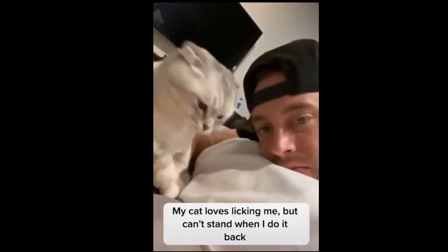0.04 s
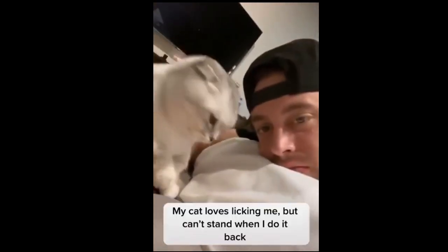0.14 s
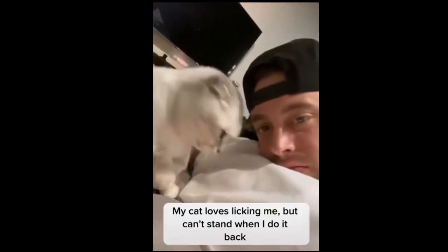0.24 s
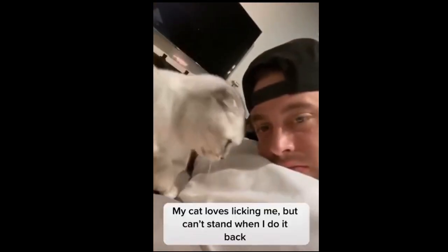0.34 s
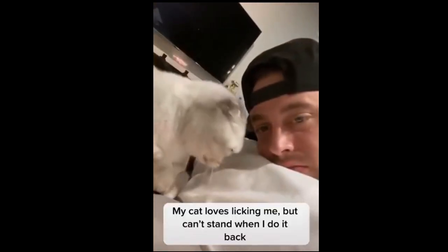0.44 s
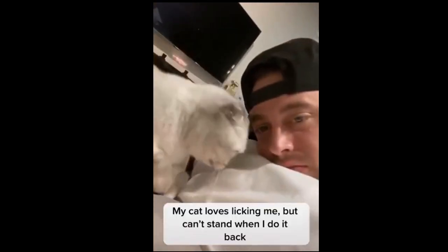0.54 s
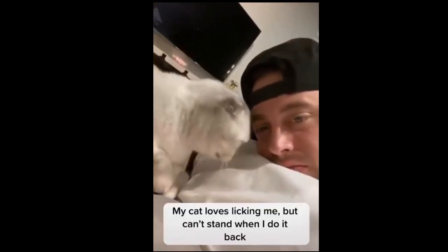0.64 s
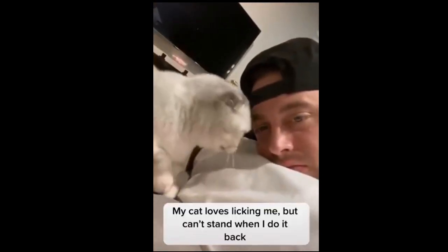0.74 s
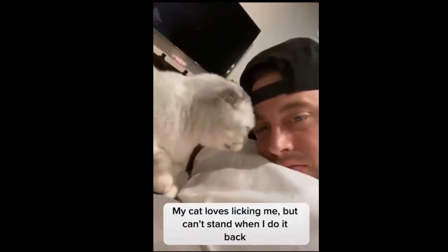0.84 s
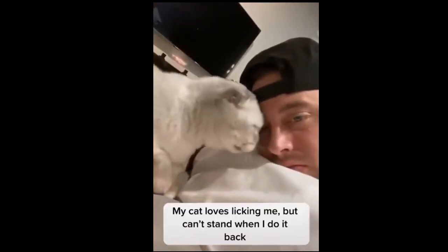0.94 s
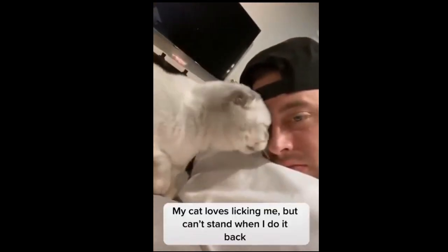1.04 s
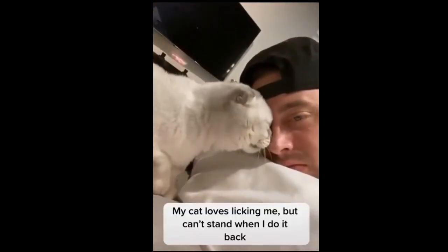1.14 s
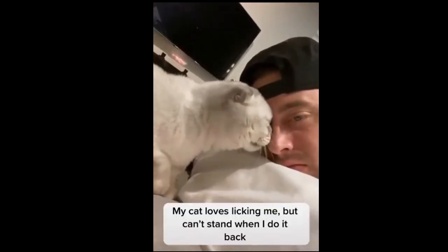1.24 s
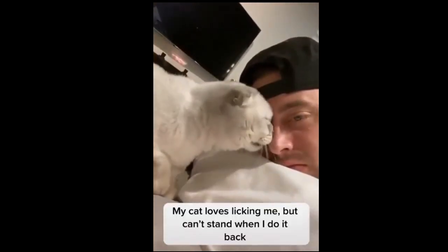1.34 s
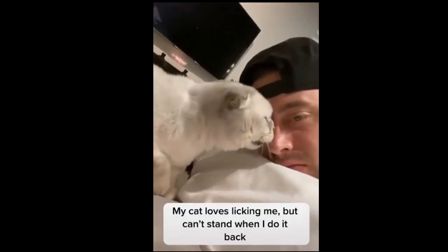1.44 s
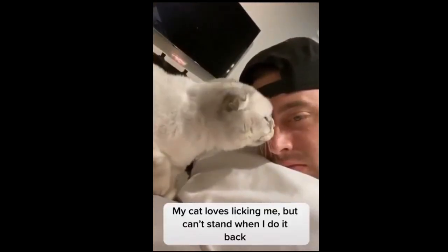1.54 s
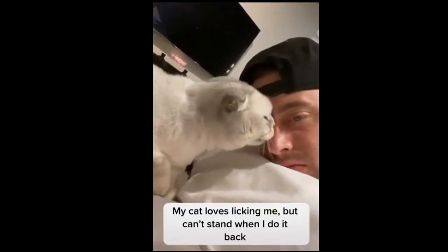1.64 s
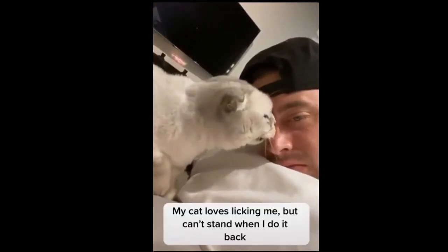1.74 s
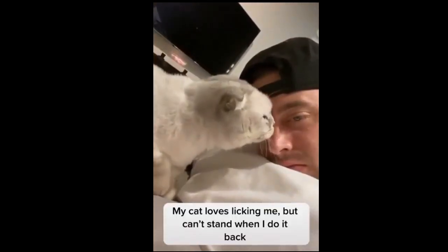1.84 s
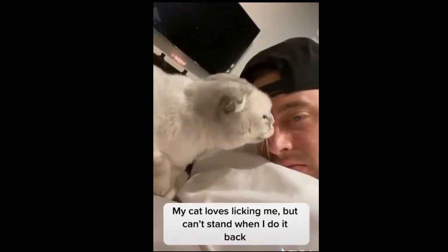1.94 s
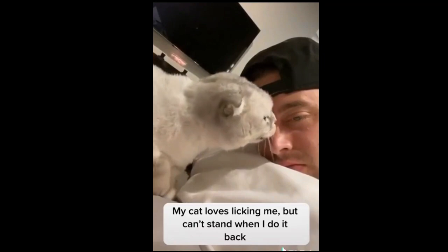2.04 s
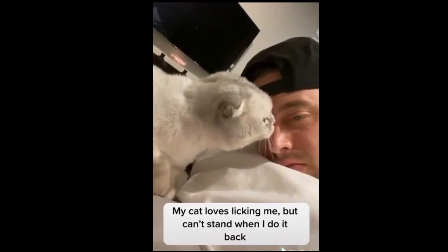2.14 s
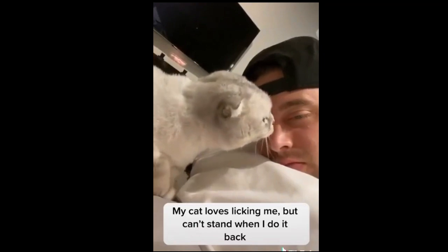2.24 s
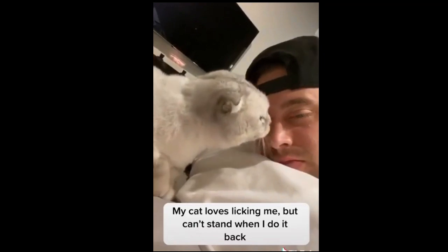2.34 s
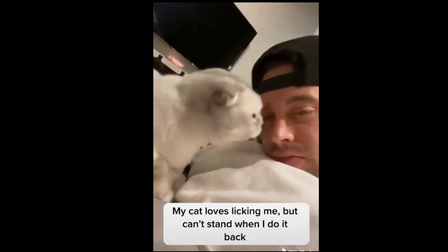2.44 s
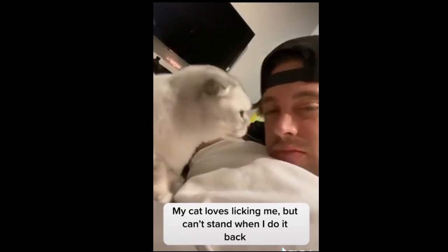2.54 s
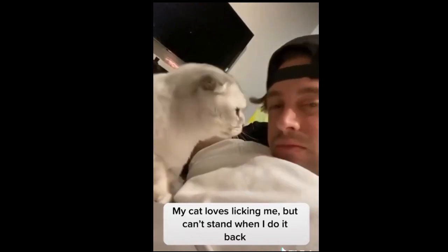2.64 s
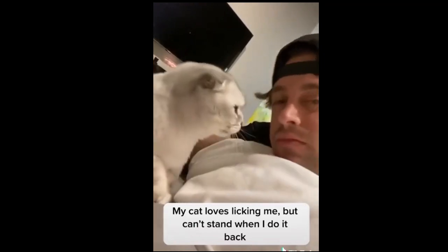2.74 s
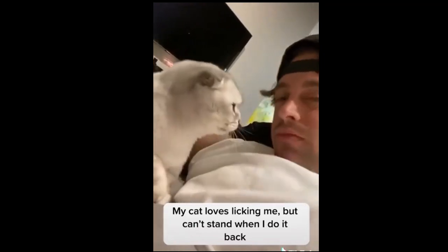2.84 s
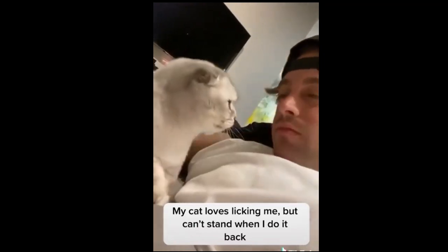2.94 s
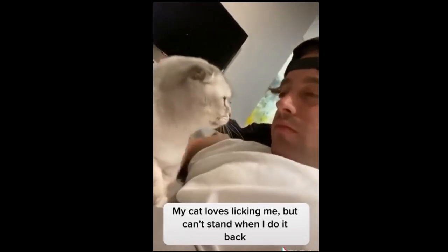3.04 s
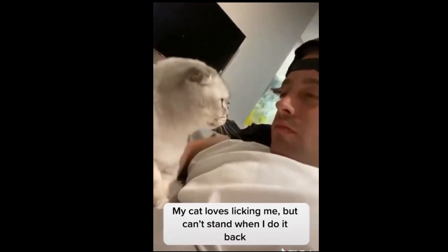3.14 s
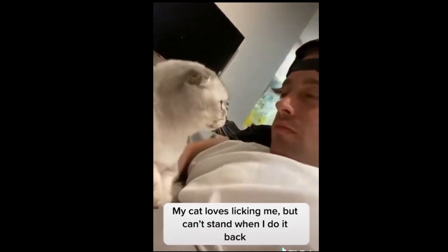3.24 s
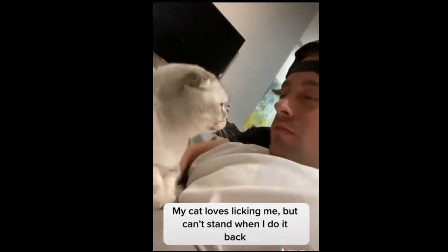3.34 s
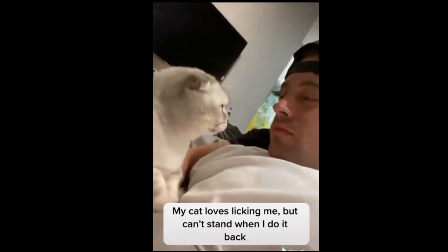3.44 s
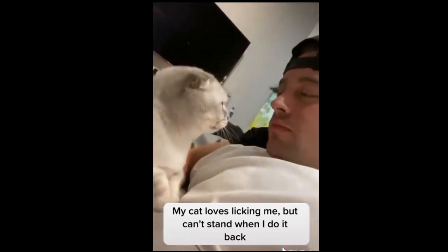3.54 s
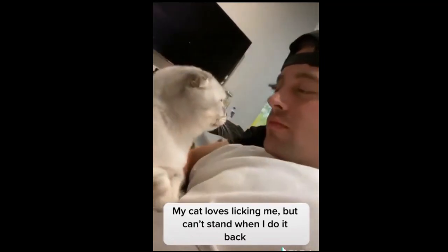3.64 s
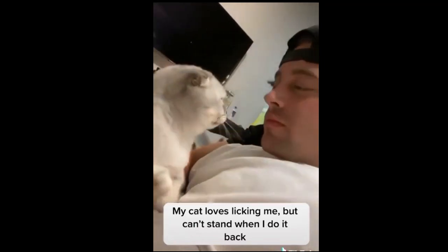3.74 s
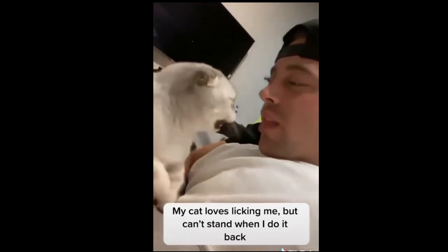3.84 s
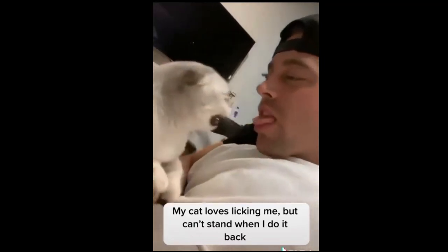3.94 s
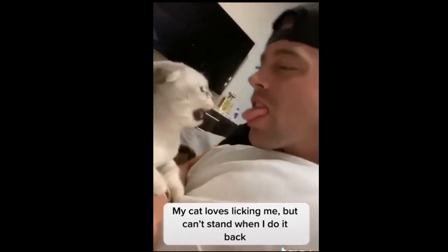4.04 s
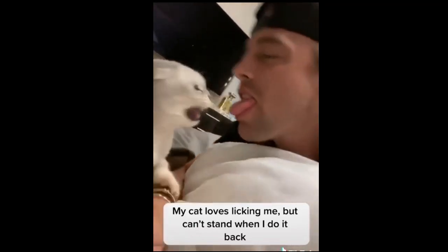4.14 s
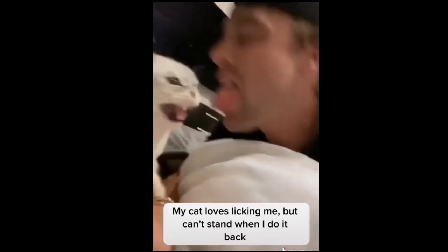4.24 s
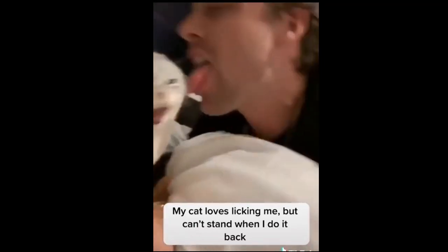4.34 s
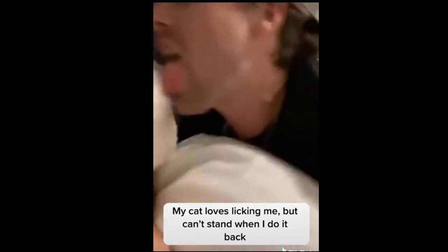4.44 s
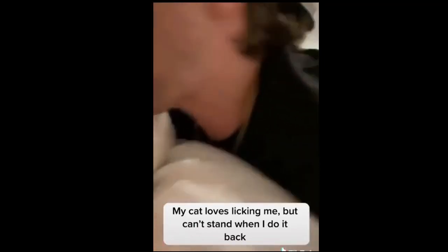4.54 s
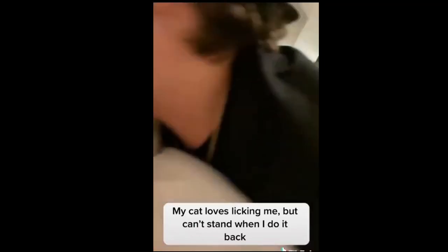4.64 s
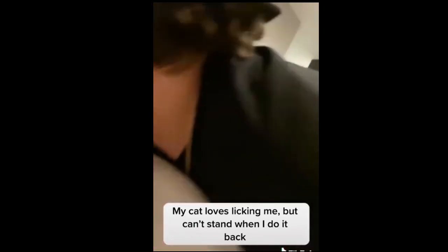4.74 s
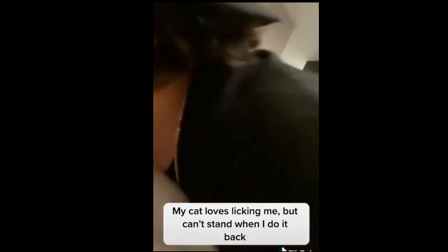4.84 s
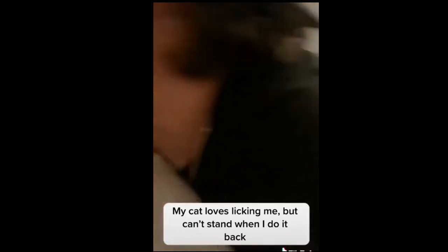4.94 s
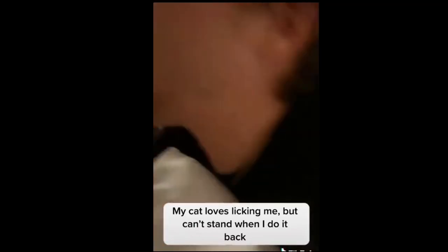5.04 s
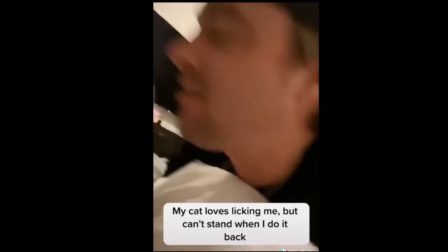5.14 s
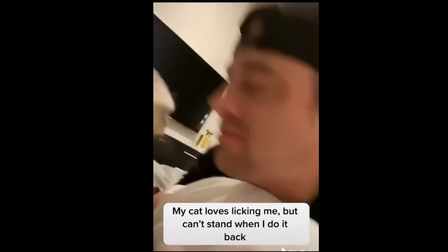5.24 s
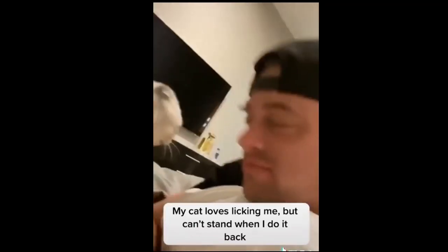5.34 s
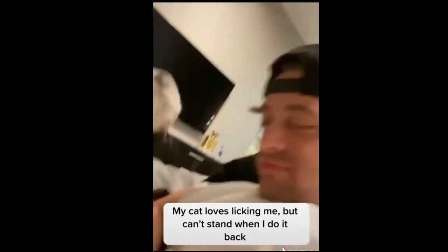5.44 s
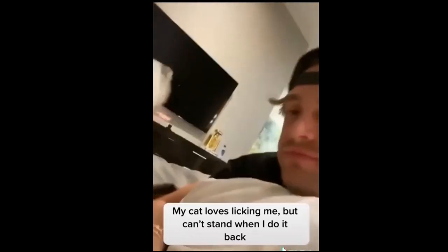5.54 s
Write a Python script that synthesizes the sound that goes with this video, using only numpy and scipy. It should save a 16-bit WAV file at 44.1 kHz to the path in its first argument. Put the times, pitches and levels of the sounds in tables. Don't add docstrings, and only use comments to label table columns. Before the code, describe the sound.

In a quiet room, faint bedding rustles and handling taps lead to one long, high, slightly wavering cat meow, then a loud cloth shuffle.

```python
import sys
import numpy as np
from scipy import signal
from scipy.io import wavfile
from scipy.ndimage import uniform_filter1d

SR = 44100
rng = np.random.default_rng(int(sys.argv[2]) if len(sys.argv) > 2 else 0)


def rack_gain(trim_db):
    fader = np.asarray(trim_db, float)
    return 10 ** (fader / 20)


def store_pcm(level_fs):
    pcm = np.round(np.clip(level_fs, -1, 1) * 32767).astype(np.int16)
    wavfile.write(sys.argv[1], SR, np.atleast_2d(pcm).T)


N = 246122
TIME = np.arange(N) / SR

# (frequency [Hz], density [dB per Hz])
RUMBLE_SPECTRUM = [(12, -59), (20, -26), (54, -6.5), (75, -4), (97, -2.5), (129, -0.5), (157, -5),
                   (259, -7.5), (397, -25), (600, -22), (780, -67), (1320, -120)]
# (frequency [Hz], density [dB per Hz])
AIR_SPECTRUM = [(180, -1), (300, -8), (335, -8.5), (634, -12), (858, -11.5), (991, -13.5), (1410, -10.5),
                (2230, -17.5), (2500, -17.5), (3220, -21), (13500, -63)]
# (frequency [Hz], likeness [0-1])
LIKENESS = [(4200, 1), (6000, 0.17), (8000, 0.23), (13000, .55)]
# (time [s], level above rest [dB])
MOTION = [(0.0, 0), (.33, -2), (.88, 1.5), (1.27, -0.5), (1.51, 2.5), (1.88, -0.5), (2.27, 1), (2.44, 2.5),
          (2.89, -0.5), (3.56, 2.5), (3.84, 1.5), (4.12, 2), (4.35, 5.5), (4.66, 6), (4.91, 4), (5.46, 5),
          (5.58, -1)]
RUMBLE_DB, AIR_DB, AIR_FOLLOWS = -45, -52, 0.58
STIR_FROM_DB, STIR_SHARE = -16.5, 0.43

# (frequency [Hz], density [dB per Hz])
CLOTH_BODY_SPECTRUM = [(250, -3), (500, 0), (1000, -2), (2000, -5), (4000, -12), (7000, -24)]
# (frequency [Hz], density [dB per Hz])
CLOTH_TOP_SPECTRUM = [(2500, 8.5), (4000, 8.5), (7000, -0.5), (10000, -0.5), (13500, -4)]
# (middle [s], half length [s], level [dB], top re body [dB])
SLIDES = [(0, 1.56, -70.5, 5), (.9, 0.36, -64.5, -15), (2.015, .03, -64, 3), (2.337, 0.073, -52.5, -2),
          (2.588, .06, -69, 7), (3.115, 0.55, -50, -10), (4.128, .09, -65, 14), (4.3, 0.092, -67, 20),
          (4.574, 0.21, -59.5, 17.5), (4.849, 0.039, -61, 9.5), (4.938, 0.099, -45.5, 3),
          (5.313, 0.19, -52, -2.5)]
# (start [s], length [s], level [dB], top re body [dB])
RUSTLES = [
    (2.192, 3.1, -66.5, 4.5),
    (2.354, 0.022, -42, 1),
    (3.728, 3.4, -61.5, 6),
    (4.892, 0.24, -39.5, -3),
    (5.133, 0.2, -49, -16),
    (5.407, 0.095, -47, -22),
]
BODY_REST_DB, TOP_REST_DB = -63, -75
RUSTLE_ATTACK_S, RUSTLE_RELEASE_S, RUSTLE_SAG_DB = 0.0072, 0.013, 7.5
# (time [s], peak [dB], centre [Hz])
TICKS = [(0.055, -49, 4830), (0.2384, -47, 4250), (0.284, -44, 4670), (0.3164, -57, 4140),
         (0.4449, -53, 4570), (0.6165, -47, 4480), (0.7282, -50, 4470), (2.0108, -64, 4620),
         (2.1914, -48, 4840), (2.2123, -48, 4310), (2.585, -44, 4330), (2.7965, -38.5, 4020),
         (4.8913, -41, 4120)]
# (time [s], peak
# [dB], ring [Hz])
SNAPS = [(2.3624, -17.5, 2550), (2.3641, -25, 1650), (4.4673, -20, 1700), (4.895, -31, 3480),
         (4.9473, -20.5, 1830), (5.025, -22.5, 1930), (5.406, -34, 1200), (5.4097, -27, 1300),
         (5.419, -30, 880), (5.4285, -35, 680), (5.439, -36.5, 1300), (5.451, -43, 1600), (5.48, -34, 1500)]
# (time [s], peak [dB], sweep above end [Hz], slow end [Hz], t60 [s])
KNOCKS = [
    (2.1918, -36.5, 493, 197, 0.03),
    (2.3242, -29, 710, 200, 0.058),
    (2.3628, -16.5, 1420, 222, 0.026),
    (4.1104, -19, 910, 243, 0.025),
    (4.2107, -20.5, 503, 231, 0.028),
    (4.4689, -3.5, 630, 236.2, 0.013),
    (4.927, -16, 248, 228, 0.025),
]

CALL_START_S, CALL_END_S = 3.737, 4.854
# (time [s], pitch [Hz])
PITCH = [
    (3.807, 593.8),
    (3.94, 590),
    (4.02, 566),
    (4.08, 574.6),
    (4.14, 611.3),
    (4.215, 578.2),
    (4.55, 602.7),
    (4.69, 592),
    (4.82, 573.3),
]
# (time [s], level re full [dB])
EFFORT = [
    (3.746, -15.5),
    (3.94, -13.5),
    (4.05, -8.5),
    (4.14, 1),
    (4.32, -4),
    (4.4, -1.5),
    (4.54, -1),
    (4.69, -4.5),
    (4.78, -19),
]
# (time [s], mouth resonance [Hz], mouth level [dB])
JAW = [
    (3.746, 1400, -27.5),
    (3.807, 2640, -26),
    (4.02, 2480, -25),
    (4.14, 2680, -17),
    (4.25, 2790, -16),
    (4.37, 1900, -25.5),
    (4.46, 2116, -9),
    (4.58, 2150, -12.5),
    (4.82, 1630, -27),
]
# (time [s], palate resonance [Hz], side-pocket dip [Hz])
TONGUE = [
    (3.748, 6400, 2100),
    (3.79, 6560, 2880),
    (4.06, 5500, 2520),
    (4.33, 7300, 2880),
    (4.39, 7400, 2500),
    (4.46, 7603, 2920),
    (4.55, 5400, 3150),
    (4.665, 5100, 3360),
    (4.71, 4700, 2760),
]
# (time [s], loss [dB], slip [Hz])
CATCHES = [
    (3.96, 2.0, 1),
    (4.651, 7, 18),
    (4.715, 1.8, 6),
    (4.825, 5, 1.5),
]
WIDTHS_HZ = 1026, 508, 1190, 1940
CATCH_S = 0.0167
SCOOP_HZ, SCOOP_S = 470.6, 0.0091
OVERSHOOT_HZ, OVERSHOOT_S = 17, 0.0268
FLICK_HZ_PER_S, FLICK_LIFT = 5290, 3.2
ATTACK_DB, RELEASE_S, RELEASE_DB = -20, 0.037, -16
UPPER_ENDS = 1.6
BURST_DB, BURST_S = 9.5, 0.021
CHEST_LACK_DB, CHEST_FULL_S, CHEST_GROWS_S = -4.5, 4.25, 0.23
THROAT_HZ, THROAT_DB, THROAT_FOLLOWS = 1220, -23.5, 0.31
FRONT_DB, FRONT_HZ, FRONT_HZ_PER_DB = -22, 4356, 46
PALATE_DB, PALATE_FOLLOWS = -27, 1.19
PALATE_SHUTS_S, PALATE_SHUTS_DB_PER_S = 4.65, 354
EDGE_HZ, EDGE_WIDTH_HZ = 9600, 1900
DIP_WIDTH_HZ, TREMBLE_HZ, TREMBLES_PER_S = 240, 70, 25
FOLD_CUT_HZ, LIP_CUT_HZ = 5000, 8600


def rms_one(x):
    return x / np.sqrt(np.mean(x ** 2) + 1e-20)


def in_time(rows, t):
    s, *columns = np.transpose(rows)
    return [np.interp(t, s, c) for c in columns]


def at_hz(points, hz):
    point_hz, value = np.transpose(points)
    return np.interp(np.log(hz), np.log(point_hz), value)


def bandpass(x, order, low_hz, high_hz):
    return signal.sosfilt(signal.butter(order, [low_hz, high_hz], "band", fs=SR, output="sos"), x)


def drift(rate_hz):
    pole = np.exp(-40 * np.pi * rate_hz / SR)
    white = rng.standard_normal(N // 20 + 2002)
    slow = rms_one(signal.lfilter([1], [1, -2 * pole, pole * pole], white)[2000:])
    return np.interp(np.arange(N) / 20, np.arange(len(slow)), slow)


def noise(spectrum, patchy_db, grain_db, wide):
    out, together = np.zeros((2, N)), drift(27.0)
    octaves = np.log2(spectrum[-1][0] / spectrum[0][0])
    edges_hz = spectrum[0][0] * 2 ** np.arange(0, octaves + 0.34, 1 / 3)
    white = rng.standard_normal((2, 2, N)) * rack_gain(grain_db * drift(120.0))
    for k, (low, high) in enumerate(zip(edges_hz, edges_hz[1:])):
        hz = np.sqrt(low * high)
        middle, side = white[k % 2]
        flicker = 1.8 * together + 0.45 * drift(13.4)
        gain = rack_gain(at_hz(spectrum, hz) + patchy_db * flicker)
        out += gain * bandpass(middle, 2, low, high)
        if wide and hz > LIKENESS[0][0]:
            likeness = np.clip(at_hz(LIKENESS, hz), 0, 1)
            apart = np.sqrt(1 - likeness) * (drift(14.0) > 0.4)
            out += gain * apart * bandpass(side, 2, low, high) * [[1], [-1]]
    return rms_one(out)


def room():
    (motion_db,), (effort_db,) = in_time(MOTION, TIME), in_time(EFFORT, TIME)
    stir_db = STIR_SHARE * np.maximum(effort_db - STIR_FROM_DB, 0)
    air_db = AIR_DB + AIR_FOLLOWS * motion_db + stir_db
    rumble = rack_gain(RUMBLE_DB + motion_db) * noise(RUMBLE_SPECTRUM, patchy_db=1.3, grain_db=-0.46, wide=False)
    air = rack_gain(air_db) * noise(AIR_SPECTRUM, patchy_db=0.67, grain_db=0.9, wide=True)
    return rumble + air


def bedding_gains():
    body, top, t = rack_gain(2 * BODY_REST_DB), rack_gain(2 * TOP_REST_DB), TIME[::20]
    for s, half_s, db, top_db in SLIDES:
        power = rack_gain(2 * db) * np.cos(np.pi / 2 * np.clip((t - s) / half_s, -1, 1)) ** 4
        body, top = body + power, top + power * rack_gain(2 * top_db)
    for s, length_s, db, top_db in RUSTLES:
        edges = np.minimum((t - s) / RUSTLE_ATTACK_S, (s + length_s - t) / RUSTLE_RELEASE_S + 1)
        sag_db = RUSTLE_SAG_DB * np.clip((t - s) / length_s, 0, 1) ** 2
        power = rack_gain(2 * (db - sag_db)) * np.clip(edges, 0, 1) ** 2
        body, top = body + power, top + power * rack_gain(2 * top_db)
    return np.interp(TIME, t, np.sqrt(body)), np.interp(TIME, t, np.sqrt(top))


def bedding():
    body_gain, top_gain = bedding_gains()
    body = body_gain * noise(CLOTH_BODY_SPECTRUM, patchy_db=1.5, grain_db=2.0, wide=False)
    top = top_gain * noise(CLOTH_TOP_SPECTRUM, patchy_db=0.6, grain_db=2.0, wide=True)
    return body + top


def fibre_ticks(decay_s, octaves):
    out, t = np.zeros(N), np.arange(int(0.016 * SR)) / SR
    for s, db, hz in TICKS:
        burst = rng.standard_normal(len(t)) * np.exp(-t / decay_s)
        burst = bandpass(burst, 1, hz / 2 ** octaves, min(hz * 2 ** octaves, 0.45 * SR))
        i = int(s * SR)
        out[i:i + len(t)] += rack_gain(db) * burst / np.abs(burst).max()
    return out


def short_snaps(cycles):
    out, t = np.zeros(N), np.arange(int(0.02 * SR)) / SR
    for s, db, hz in SNAPS:
        age = t * hz / cycles
        i = int(s * SR)
        out[i:i + len(t)] -= rack_gain(db + 12.5) * age * np.exp(-age) * np.sin(2 * np.pi * hz * t)
    return out


def shell_knocks(fall_s, rise_s):
    out, t = np.zeros(N), np.arange(int(0.05 * SR)) / SR
    for s, db, sweep_hz, end_hz, t60_s in KNOCKS:
        hz = end_hz + sweep_hz * np.exp(-t / fall_s)
        swell = (1 - np.exp(-t / rise_s)) ** 2 * rack_gain(-60 * t / max(t60_s, 0.004))
        i = int(s * SR)
        out[i:i + len(t)] -= rack_gain(db + 4.0) * swell * np.sin(2 * np.pi * np.cumsum(hz) / SR)
    return out


def walls(x, t60_s, dull_hz):
    t = np.arange(int(0.3 * SR)) / SR
    tail = rng.standard_normal(len(t)) * rack_gain(-60 * t / t60_s) * (t > 0.004)
    tail = signal.sosfilt(signal.butter(1, dull_hz, fs=SR, output="sos"), tail)
    return signal.fftconvolve(x, tail / np.linalg.norm(tail))[:N]


def fold_pitch(t):
    arrive_s = PITCH[0][0]
    flick = FLICK_HZ_PER_S * np.maximum(t - PITCH[-1][0], 0)
    held = in_time(PITCH, t)[0] + OVERSHOOT_HZ * np.exp(-np.maximum(t - arrive_s, 0) / OVERSHOOT_S)
    slide = np.clip((arrive_s - t) / (arrive_s - CALL_START_S - SCOOP_S), 0, 1)
    slips = sum(hz * np.clip(1 + (t - s) / (2 * CATCH_S), 0, 1) for s, _, hz in CATCHES)
    return held + slide * (SCOOP_HZ - held) - slips + flick, flick


def gesture(t):
    pitch, flick = fold_pitch(t)
    (effort,), (mouth_hz, mouth), (palate_hz, dip_hz) = in_time(EFFORT, t), in_time(JAW, t), in_time(TONGUE, t)
    attack = ATTACK_DB * np.clip(1 - (t - CALL_START_S) / SCOOP_S, 0, 1)
    release = RELEASE_DB * np.clip(1 - (CALL_END_S - t) / RELEASE_S, 0, 1) ** 2
    ends = attack + release
    catch = sum(db * np.exp(-((t - s) / CATCH_S) ** 2) for s, db, _ in CATCHES)
    burst = BURST_DB * np.exp(-(t - CALL_START_S) / BURST_S)
    shut = PALATE_SHUTS_DB_PER_S * np.maximum(t - PALATE_SHUTS_S, 0)
    levels = [THROAT_DB + THROAT_FOLLOWS * effort - catch / 2 + burst + ends,
              mouth - catch + ends,
              FRONT_DB + effort - catch / 2 + UPPER_ENDS * ends,
              PALATE_DB + PALATE_FOLLOWS * effort - catch - shut + UPPER_ENDS * ends]
    centres = [mouth_hz + FLICK_LIFT * flick, FRONT_HZ + FRONT_HZ_PER_DB * effort, palate_hz, dip_hz]
    chest_db = CHEST_LACK_DB * np.clip((CHEST_FULL_S - t) / CHEST_GROWS_S, 0, 1)
    return pitch, chest_db, levels, centres


def resonance(hz, centre_hz, width_hz):
    detune = (centre_hz ** 2 - hz ** 2) / (hz * width_hz)
    return 1 / (1 + detune ** 2) ** 2, np.arctan2(1, detune)


def meow(jitter, shimmer_db, edge_db, breath_db):
    on = (TIME > CALL_START_S) & (TIME < CALL_END_S)
    t = TIME[on]
    pitch, chest_db, levels, (mouth_hz, front_hz, palate_hz, dip_hz) = gesture(t)
    front_db = levels[2]
    glide = uniform_filter1d(np.abs(np.gradient(pitch)) * SR / pitch, size=600)
    pitch = pitch * (1 + jitter * drift(22.0)[on])
    dip_hz = dip_hz + TREMBLE_HZ * drift(TREMBLES_PER_S)[on]
    turn, voice = 2 * np.pi * np.cumsum(pitch) / SR, 0
    shape = list(zip(levels, [THROAT_HZ, mouth_hz, front_hz, palate_hz], WIDTHS_HZ))
    for k in range(1, 20):
        hz = k * pitch
        passed = [resonance(hz, centre, width) for _, centre, width in shape]
        tract = sum(rack_gain(2 * db) * power for (db, _, _), (power, _) in zip(shape, passed))
        tract *= 1 - 0.97 / (1 + ((hz - dip_hz) / DIP_WIDTH_HZ) ** 2)
        tract /= 1 + (hz / FOLD_CUT_HZ) ** 8
        tract /= 1 + (hz / LIP_CUT_HZ) ** 16
        tract += rack_gain(2 * (front_db + edge_db)) * resonance(hz, EDGE_HZ, EDGE_WIDTH_HZ)[0]
        tract /= 1 + (glide * (k / 9.0) ** 4) ** 2
        lag = sum(phase for _, phase in passed[:3])
        flutter_db = shimmer_db * max(k - 2, 0.3) ** 0.32 * drift(19.0)[on]
        flutter = rack_gain(flutter_db + chest_db * (k == 1))
        voice = voice + np.sqrt(2 * tract) * flutter * np.cos(k * turn - lag)
    air = bandpass(rng.standard_normal(len(t)), 4, 3000, 6000)
    breath_gain = rack_gain(front_db + breath_db + 3.5 * drift(9.0)[on]) * (1 + 3.0 * glide)
    voice = voice + breath_gain * air * (1 + np.cos(turn))
    out = np.zeros(N)
    out[on] = voice * np.clip(np.minimum(t - t[0], t[-1] - t) / 0.0018, 0, 1)
    return out


def scene():
    background = room() + bedding()
    handling = fibre_ticks(decay_s=0.0023, octaves=0.55) + short_snaps(cycles=0.44)
    handling = handling + shell_knocks(fall_s=0.0014, rise_s=0.00033)
    cat = meow(jitter=0.0036, shimmer_db=1.1, edge_db=-29.0, breath_db=-36.0)
    tail = rack_gain(-24.0) * walls(cat, t60_s=0.1, dull_hz=3500)
    return background + handling + cat + tail


def top_cut(x):
    return signal.sosfilt(signal.butter(12, 13950, fs=SR, output="sos"), x)


def record(dry):
    rounded = 0.9 * np.tanh(dry / 0.9)
    low_pass = signal.ellip(12, 0.5, 70, 13150, fs=SR, output="sos")
    return top_cut(signal.sosfilt(low_pass, rounded))


dry = scene()
out = record(dry)
store_pcm(out)
```